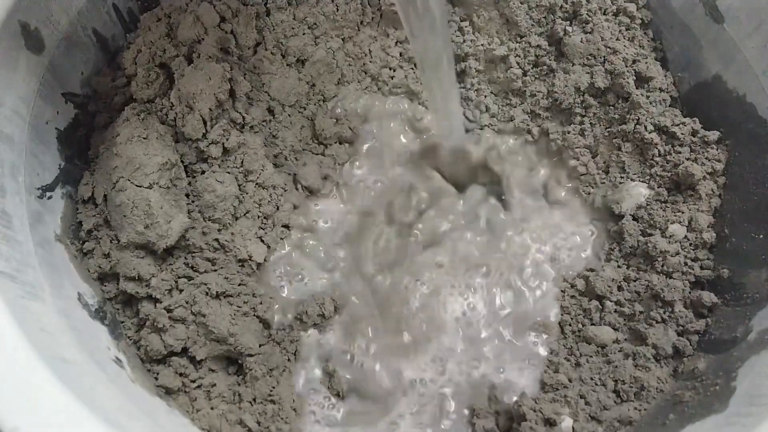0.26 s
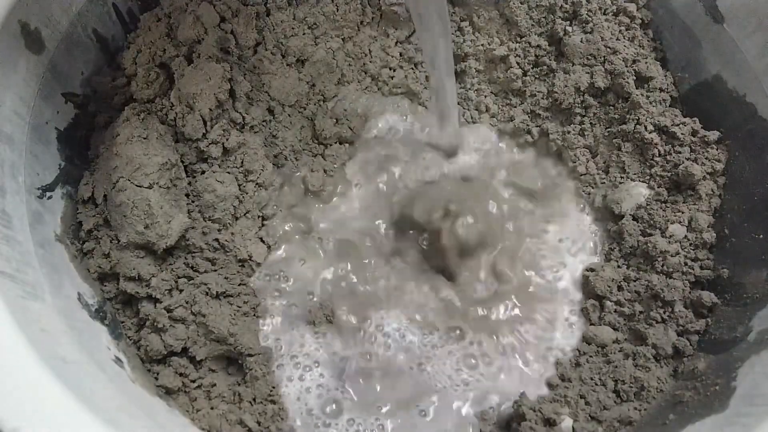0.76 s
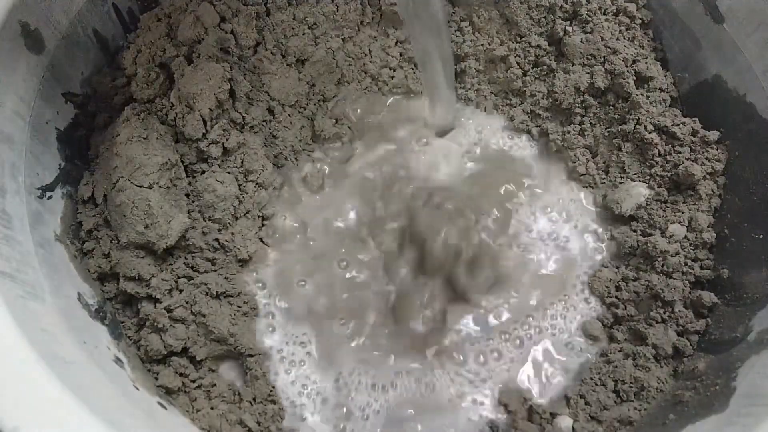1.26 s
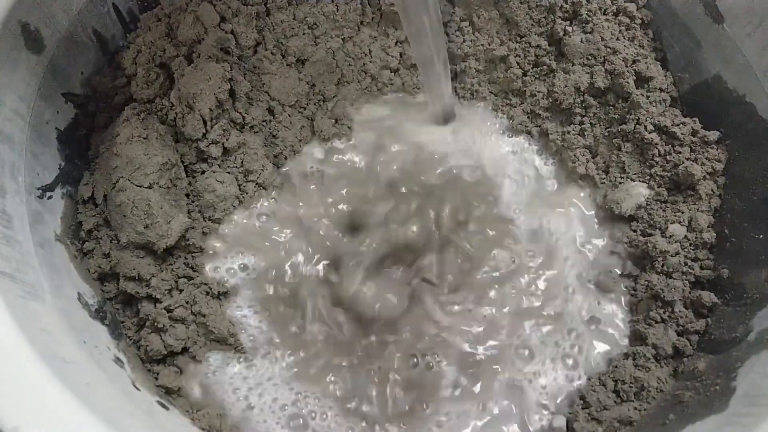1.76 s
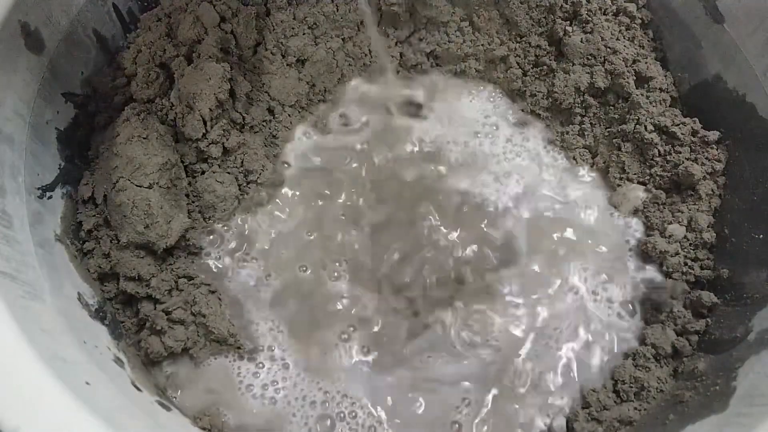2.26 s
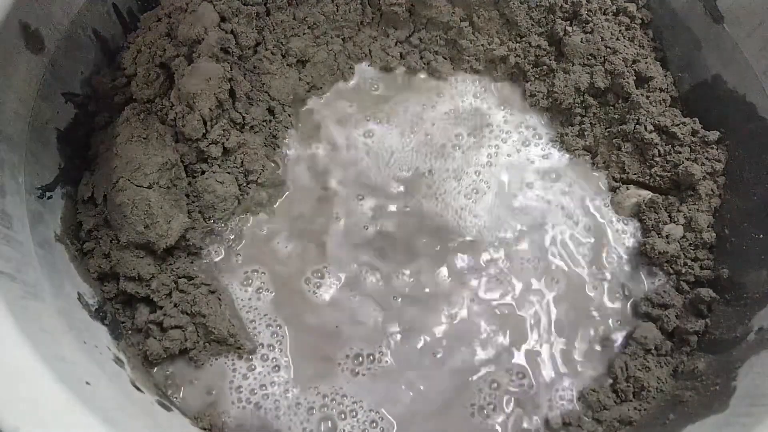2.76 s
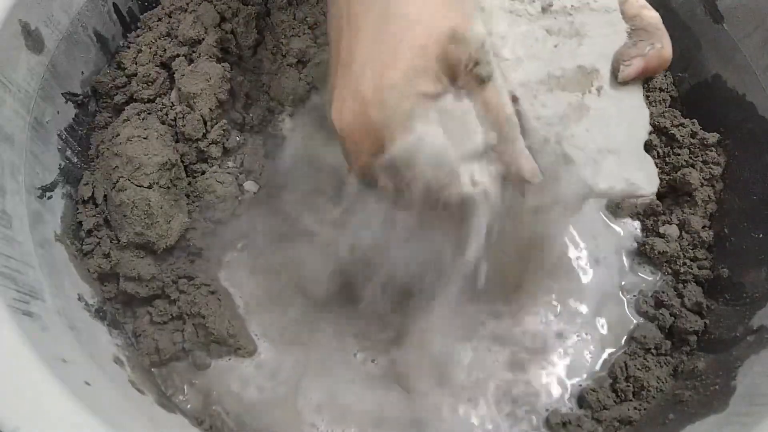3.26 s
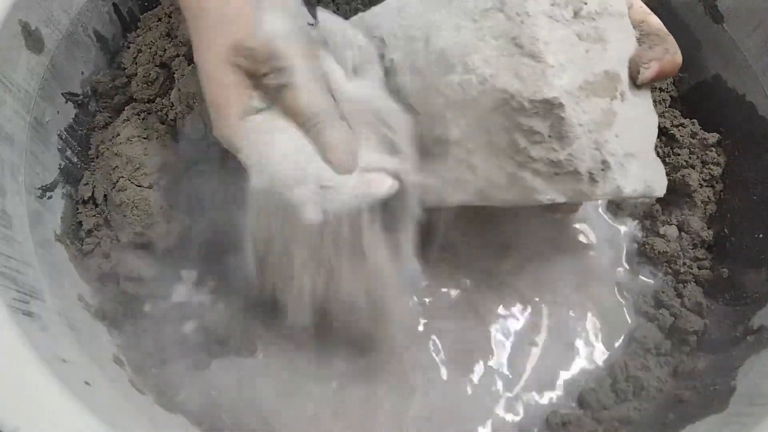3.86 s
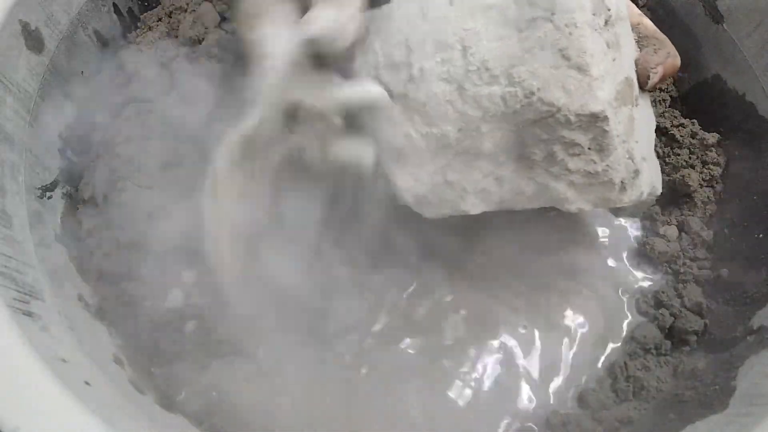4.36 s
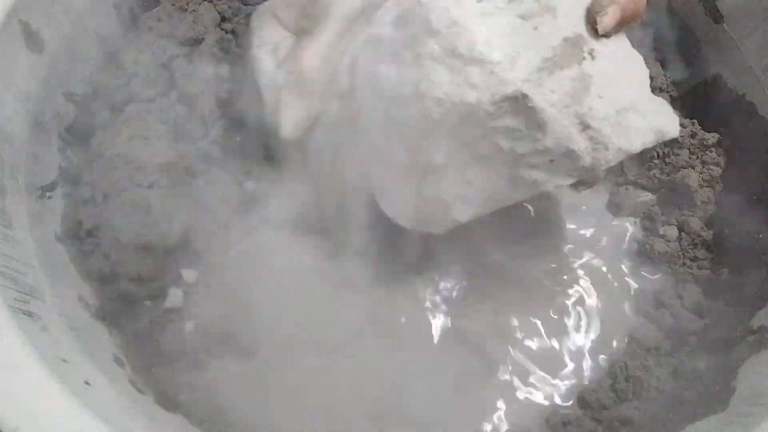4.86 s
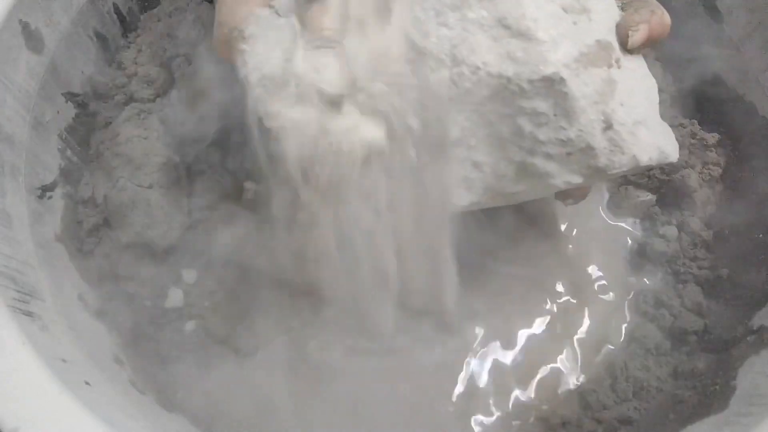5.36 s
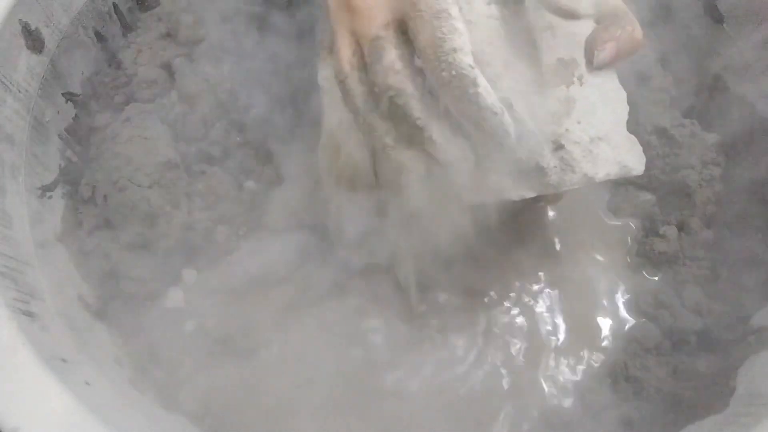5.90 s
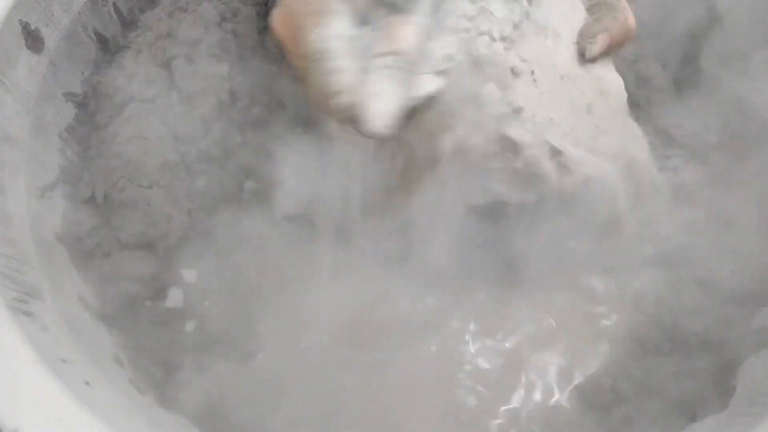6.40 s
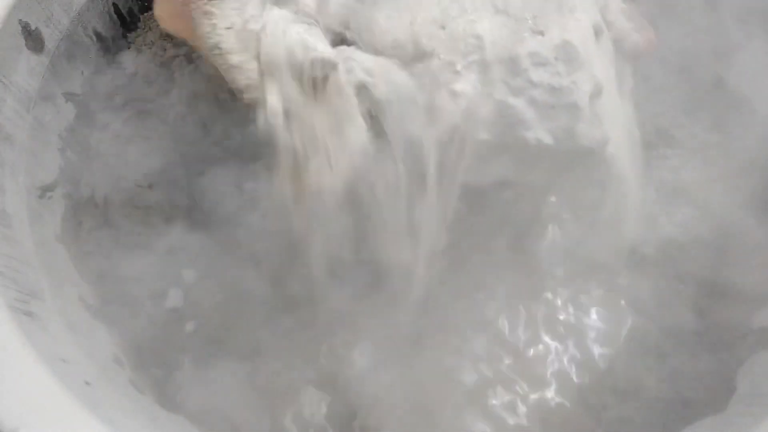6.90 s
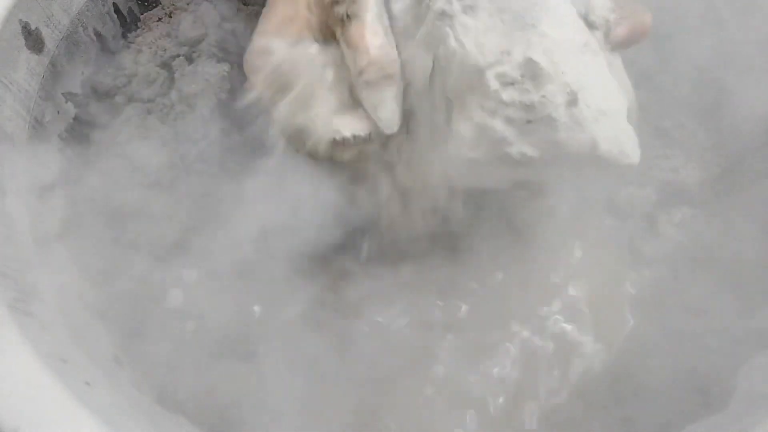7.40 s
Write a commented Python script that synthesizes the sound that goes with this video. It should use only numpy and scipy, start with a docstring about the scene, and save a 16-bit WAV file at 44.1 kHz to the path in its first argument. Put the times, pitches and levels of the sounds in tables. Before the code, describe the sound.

A short pour gurgles and thins out, then gritty sand showers hiss into the puddle with crunching lumps, soft bubbling and small plips.

```python
"""In a quiet room, a stream of water is poured onto sand in a plastic basin: it splatters, gulps and stops.
Its foam fizzes on, then a hand crumbles a dry sand-cement block over the puddle: lumps crunch, grit hisses down,
drags clouds of small bubbles under, and crumbs plip into the water.
Water is built from ringing bubbles, sand from dense random impacts shaped by spectra, over a low room rumble."""
import sys
import numpy as np
from scipy import signal
from scipy.fft import rfft, irfft, next_fast_len
from scipy.io import wavfile
from scipy.ndimage import uniform_filter1d

SR = 44100
rng = np.random.default_rng(int(sys.argv[2]) if len(sys.argv) > 2 else 0)


def inscribe(sig):
    """Save sig as 16-bit PCM at rate SR to the path in sys.argv[1].

    A 1-D sig is mono; a 2-D sig holds one channel per row.
    Samples are clipped to [-1, 1] before scaling.
    """
    pcm = np.round(np.clip(np.atleast_2d(sig).T, -1, 1) * 32767)
    wavfile.write(sys.argv[1], SR, pcm.astype(np.int16))


N = 336924
TIME = np.arange(N) / SR
CUTOFF_HZ = 16000
# edge of the steady layers, and how gently falling sand and the stream's beads die away
BED_EDGE_S, FALL_RELEASE_S = 0.0076, 0.039


def from_db(db):
    """Decibels to gain."""
    return 10 ** (np.asarray(db) / 20)


def rms_one(x):
    """Scale to unit power."""
    return x / np.sqrt(np.mean(x ** 2) + 1e-20)


def gains(rows):
    """Turn a (time, level) table into a gain per sample, dying away quickly outside its span."""
    s, db = np.transpose(rows)
    outside = np.maximum(s[0] - TIME, 0) + np.maximum(TIME - s[-1], 0)
    fade = np.exp(-np.minimum(outside / 0.11, 20))
    return from_db(np.interp(TIME, s, db)) * fade


def held(s, length, attack, release):
    """An envelope that rises, holds and dies away."""
    rise = np.clip((TIME - s) / attack, 0, 1)
    return rise * np.exp(-np.clip((TIME - s - length) / release, 0, 30))


def add(out, s, sound):
    """Mix a short sound in at a time."""
    i = min(max(int(s * SR), 0), len(out))
    out[i:i + len(sound)] += sound[:len(out) - i]


def coloured(x, spectrum):
    """Filter a signal through a (frequency, gain) table; rms 1."""
    hz, db = np.transpose(spectrum)
    size = next_fast_len(N)
    bins = np.maximum(np.arange(size // 2 + 1) * SR / size, 1)
    shape = from_db(np.interp(np.log(bins), np.log(hz), db, left=-90, right=-90))
    return rms_one(irfft(rfft(x, size) * shape, size)[:N])


def highpass(x, hz):
    """Remove what lies below a frequency."""
    return signal.sosfilt(signal.butter(4, hz, "high", fs=SR, output="sos"), x)


def drift(rate):
    """Smooth random wander, with `rate` turning points per second at most; rms 1."""
    knots = rng.standard_normal(4096)
    return rms_one(np.interp(TIME * rate, np.arange(len(knots)), knots))


def grains(per_s, spread_db):
    """Random tiny impacts, mostly small and a few large; rms 1."""
    sizes = from_db(spread_db * np.minimum(rng.exponential(1, N), 5))
    sizes = sizes * np.sign(rng.standard_normal(N))
    return rms_one(sizes * (rng.random(N) < per_s / SR))


def bubble(hz, t60, swell, rise):
    """A bubble swells, rings down and, where `rise` is set, climbs in pitch as it nears the surface."""
    t = np.arange(int((t60 + 2 * swell) * SR) + 2) / SR
    ring = np.sin(2 * np.pi * hz * (t + rise * t * t / (2 * t60)))
    return ring * (1 - np.exp(-t / swell)) * from_db(-60 * t / t60)


def swarm(low_hz, high_hz, cycles, spread_db, rise, count):
    """Bubbles born at random moments with random sizes, strengths and lifetimes; rms 1."""
    pitches = np.geomspace(low_hz, high_hz, 256)
    lives = rng.random(len(pitches))
    kinds = [bubble(hz, cycles * (.5 + life) / hz, .5 / hz, rise) for hz, life in zip(pitches, lives)]
    when, size, force = rng.random((count, 3)).T
    strengths = from_db(spread_db * np.minimum(-np.log(1 - force), 3.5))
    picks = (size * len(kinds)).astype(int)
    out = np.zeros(N)
    for s, kind, strength in zip((when * N / SR).tolist(), picks, strengths):
        add(out, s, strength * kinds[kind])
    return rms_one(out)


# the crater under the jet: first pitch, climb and top; sharpness, starting level, fade time
CRATER_HZ, CRATER_OCTAVES_PER_S, CRATER_TOP_HZ = 1510, 3.9, 5400
CRATER_Q, CRATER_DB, CRATER_FLOOD_S = 10, 1.5, 1


def crater(x):
    """The jet digs a narrow crater in the sand, whose ring climbs and fades as it floods."""
    out, state, size = np.zeros(N), np.zeros(2), 128
    for i in range(0, SR, size):  # the first second only
        hz = min(CRATER_HZ * 2 ** (CRATER_OCTAVES_PER_S * i / SR), CRATER_TOP_HZ)
        peak = signal.iirpeak(hz, CRATER_Q, fs=SR)
        out[i:i + size], state = signal.lfilter(*peak, x[i:i + size], zi=state)
    return from_db(CRATER_DB) * np.exp(-(TIME / CRATER_FLOOD_S) ** 2) * out


# force of the jet on the puddle, heard as splatter, before a small trim: (time [s], level [dB])
JET_FORCE = [(0.0, -39), (0.22, -37.5), (0.36, -41.5), (0.48, -45), (0.7, -44.5), (0.8, -49), (0.92, -47.5),
             (1.08, -46), (1.22, -54.5), (1.4, -53), (1.659, -44.5), (1.8, -46.5), (2.099, -48.5),
             (2.24, -49.5), (2.4, -55.5), (2.5, -72.5)]
# air that the jet drags under, heard as gurgle: (time [s], level [dB])
DRAGGED_AIR = [(0.0, -58), (0.17, -58), (0.23, -47.5), (0.29, -48.5), (0.35, -42), (0.43, -54.5),
               (0.64, -53.5), (0.8, -57), (0.9, -62.5), (1.07, -48.5), (1.24, -68.5), (1.43, -67.5),
               (1.55, -44.5), (1.65, -44.5), (1.73, -55), (1.95, -51), (2.26, -62), (2.41, -61), (2.5, -82)]
# colour of the large bubbles: (frequency [Hz], gain [dB])
GURGLE_COLOUR = [(120, -15), (280, -11.5), (400, -9.5), (500, -2), (620, -9.5), (780, -2), (1000, -4.5),
                 (1300, 0), (2500, -40)]
# colour of the small bubbles: (frequency [Hz], gain [dB])
SPLATTER_COLOUR = [(600, -2), (1100, -6.5), (1700, -1.5), (2050, -0.5), (2500, 2.5), (4100, 4.5),
                   (5200, -1), (6400, -17.5), (9000, -49.5)]
# colour of the stream's mist, and of foam and fine sand in the grit: (frequency [Hz], gain [dB])
HISS_COLOUR = [(1500, -41), (3000, -14.5), (4800, -10.5), (6500, -11), (8000, -5.5), (9300, -2.5),
               (10700, -3), (12000, -6.5), (13200, -13.5), (14500, -18.5), (15600, -42)]
# spray level at the jet's usual force, and its share of the jet's swing in dB
SPRAY_DB, SPRAY_FOLLOWS, USUAL_JET_DB = -49, 0.69, -44.5
# the thinning stream breaks into beads that ring high
BEADS_START_S, BEADS_LENGTH_S, BEADS_DB = 2.07, 0.24, -51


def stream():
    """The jet beats air into the puddle: large bubbles gurgle, small ones splatter, the tiniest fizz on top."""
    gurgle, splatter = gains(DRAGGED_AIR), gains(JET_FORCE)
    spray = from_db(SPRAY_DB) * (splatter / from_db(USUAL_JET_DB)) ** SPRAY_FOLLOWS
    # the jet breaks into slugs that land one after another
    surge = from_db(2.1 * drift(140))
    wash = grains(9000, spread_db=2)
    large = swarm(338, 1148, cycles=31, spread_db=-2.0, rise=0.15, count=2000)
    large = coloured(large + from_db(-3) * wash, GURGLE_COLOUR)
    small = swarm(964, 6050, cycles=29, spread_db=2.0, rise=0.22, count=7500)
    small = coloured(small + from_db(-4) * wash, SPLATTER_COLOUR)
    small = small + crater(small)
    mist = swarm(4470, 20000, cycles=130, spread_db=2.0, rise=0.042, count=8000)
    mist = coloured(mist + from_db(3.0) * grains(21000, spread_db=5.5), HISS_COLOUR)
    beads = swarm(2400, 6300, cycles=30, spread_db=3.0, rise=0.16, count=1100)
    beads = held(BEADS_START_S, BEADS_LENGTH_S, BED_EDGE_S, FALL_RELEASE_S) * beads
    jet = gurgle * large + from_db(-1.3) * splatter * small + spray * mist
    return surge * jet + from_db(BEADS_DB) * beads


# colour of the room's rumble: (frequency [Hz], gain [dB])
ROOM_COLOUR = [(20, -18.5), (45, -13), (70, -2.5), (100, -6.5), (140, 0.5), (200, -11.5), (300, -13.5),
               (500, -15.5), (900, -25.5), (3000, -47.5)]
ROOM_DB = -77


def room_tone():
    """The quiet room rumbles steadily: noise weighted towards the lows."""
    return from_db(ROOM_DB) * coloured(rng.standard_normal(N), ROOM_COLOUR)


def basin(x, wall_db, ring_t60):
    """A short sound rattles briefly between the basin's walls and the water."""
    t = np.arange(1536) / SR
    echoes = rng.standard_normal(len(t)) * from_db(-60 * t / ring_t60) * (t > .0003)
    direct = t == 0
    path = from_db(wall_db) * echoes / np.linalg.norm(echoes) + direct
    return signal.fftconvolve(x, path)


# the loudest drops and crumbs hitting the water, levels before trims:
# (time [s], pitch [Hz], plip level [dB], tick level [dB])
IMPACTS = [(0.002, 2290, -7, -47), (0.02, 2100, -18.5, -22), (0.068, 1440, -16, -64),
           (0.118, 2230, -13.5, -36), (0.197, 1950, -14.5, -34), (0.212, 2500, -18, -20),
           (0.215, 1540, -7, -21.5), (0.239, 900, -15.5, -38), (0.301, 1230, -15, -57),
           (0.374, 2800, -19, -23.5), (0.458, 3920, -26, -14.5), (0.532, 1960, -19.5, -38),
           (0.587, 1140, -18, -37), (0.83, 1860, -19.5, -23), (0.849, 1740, -18.5, -44),
           (0.882, 2350, -15, -43), (0.888, 2140, -29, -31), (0.9, 1100, -16.5, -25.5),
           (0.987, 5500, -20, -55), (1.0, 4250, -32, -24.5), (1.207, 1610, -55, -22),
           (1.242, 3680, -28, -42), (1.305, 1850, -17, -21), (1.414, 1070, -16, -27.5),
           (1.469, 2580, -11, -17.5), (1.532, 1120, -11.5, -19), (1.55, 1380, -7, -28),
           (1.571, 2100, -21, -16), (1.628, 2350, -15, -34), (1.636, 2320, -19, -16.5),
           (1.674, 1850, -19.5, -22), (1.686, 1900, -22, -42), (1.703, 1620, -20, -38),
           (1.776, 2740, -21.5, -20.5), (1.845, 1580, -22, -25.5), (1.89, 2710, -18, -28),
           (1.938, 5700, -33, -8.5), (1.959, 4400, -20, -31), (1.971, 3150, -22.5, -27),
           (2.081, 4720, -23, -54), (2.108, 2980, -33, -25), (2.139, 4630, -17.5, -54),
           (2.156, 4270, -46, -21), (2.18, 2440, -24, -19), (2.215, 2980, -23.5, -58),
           (2.254, 3140, -19, -25.5), (2.287, 3350, -30, -26), (2.309, 5370, -29, -23),
           (2.358, 3360, -26.5, -35), (2.364, 4150, -30, -40), (2.383, 4800, -29, -46),
           (2.433, 5450, -57, -28.5), (2.444, 3270, -46, -31), (2.648, 1200, -44, -59),
           (2.726, 4820, -20.5, -70), (3.318, 2150, -23, -24.5), (3.442, 2830, -19.5, -46),
           (3.458, 3030, -26, -52), (3.533, 3450, -28, -51), (3.57, 1180, -21.5, -32),
           (3.62, 1390, -27, -34), (3.664, 1230, -28, -46), (3.749, 970, -29.5, -50),
           (3.757, 1300, -32.5, -30), (3.784, 1370, -37.5, -28), (3.972, 2680, -28, -46),
           (4.049, 3100, -36.5, -43), (4.169, 3830, -38, -49), (4.221, 1260, -33, -47),
           (4.252, 1350, -32.5, -64), (4.588, 3400, -23.5, -79), (4.879, 5400, -29.5, -35),
           (5.545, 4270, -31, -66.5), (5.779, 2120, -40.5, -47), (6.01, 1580, -24.5, -66),
           (6.49, 3400, -33, -36), (6.739, 2940, -26.5, -39), (6.77, 5700, -34.5, -36),
           (6.901, 5640, -23.5, -36), (6.943, 2670, -32.5, -21.5), (6.955, 3620, -28, -28.5),
           (6.982, 1790, -27, -35), (7.101, 3800, -31, -62), (7.113, 2460, -19, -24.5),
           (7.118, 2510, -9, -26), (7.16, 1490, -30, -47), (7.242, 1820, -26.5, -30)]
# heavy drops of the stream slap deeper than dry crumbs
DROP_LOW_HZ, CRUMB_LOW_HZ = 366, 1100


def drops():
    """Each impact slaps the surface, ticks, and traps one short-lived bubble."""
    plips, slaps, ticks = np.zeros((3, N))
    chances = rng.standard_normal((len(IMPACTS), 2))
    for (s, hz, plip_db, tick_db), (life, tone) in zip(IMPACTS, chances):
        plip_t60 = 0.0052 * min(1, 3000 / hz) * np.exp(0.073 * life)
        plip = bubble(hz, plip_t60, swell=0.000164, rise=0.026)
        plip = highpass(basin(plip, wall_db=-2.5, ring_t60=0.015), hz=0.83 * hz)
        add(plips, s, from_db(plip_db - 2.5) * plip)

        low_hz = DROP_LOW_HZ if s < FOAM_START_S else CRUMB_LOW_HZ
        slap = bubble(3800, t60=0.0005, swell=.00003, rise=0)
        slap = highpass(basin(slap, wall_db=-15, ring_t60=0.072), hz=low_hz)
        add(slaps, s, from_db((plip_db + tick_db) / 2 + 12.0) * slap)

        tick = bubble(9300 * np.exp(0.028 * tone), t60=0.0011, swell=.00003, rise=0)
        add(ticks, s, from_db(tick_db + 5.5) * basin(tick, wall_db=-3.5, ring_t60=0.016))
    return plips + slaps + highpass(ticks, hz=2940)


# big air bubbles, level before a trim: (time [s], pitch [Hz], level [dB], ring t60 [s])
AIR_POCKETS = [(0.637, 510, -27, 0.016), (.885, 771, -33, 0.1), (1.417, 994, -26, 0.026),
               (1.487, 459, -21.5, 0.12), (1.533, 480, -16.5, 0.017), (1.566, 574, -14.5, 0.038),
               (1.578, 573, -29.5, 0.15), (1.637, 762, -22, 0.056), (1.642, 860, -17, 0.023),
               (1.672, 980, -25, 0.038), (1.683, 934, -24.5, 0.036), (1.738, 664, -23, 0.081),
               (1.822, 745, -30.5, .06), (1.856, 774, -14, 0.026), (1.884, 945, -18, 0.036),
               (1.943, 456, -35, 0.056), (2.385, 530, -42.5, 0.065), (3.074, 645, -53.5, 0.11),
               (3.635, 387, -48, 0.047), (5.677, 636, -54, 0.055), (6.325, 456, -27, 0.0076),
               (7.152, 524, -34, 0.0092)]
GULP_SWELL_SHARE, GULP_RISE = 0.052, .11   # shares of its ringing time and of its pitch


def gulps():
    """Large pockets of air pinch off under the stream and behind sinking lumps."""
    out = np.zeros(N)
    for s, hz, db, t60 in AIR_POCKETS:
        add(out, s, from_db(db - 2.5) * bubble(hz, t60, GULP_SWELL_SHARE * t60, GULP_RISE))
    return highpass(out, hz=207.5)


# the fingers rub off a pinch of sand, level before a trim: (time [s], length [s], level [dB])
PINCHES = [(2.869, 0.11, -54), (3.07, 0.031, -50.5), (3.159, 0.019, -40), (4.374, 0.027, -60.5),
           (4.443, 0.022, -61), (4.586, 0.17, -59), (5.68, 0.049, -60), (5.864, 0.024, -67),
           (5.956, 0.1, -61.5), (6.06, 0.075, -61), (6.85, 0.096, -54.5)]
# a handful slides into the water and drags air under, levels before trims:
# (time [s], swell [s], length [s], patter level [dB],
#  bubble cloud pitch [Hz], its spread [log pitch], cloud level [dB]); the cloud plays in plunges()
HANDFULS = [(3.28, 0.059, 0.26, -51, 538, 0.233, -52.5), (3.582, 0.02, 0.15, -60, 743, 0.21, -62),
            (3.925, 0.066, 0.13, -57.5, 900, 0.1, -58.5), (4.189, 0.073, 0.12, -60, 1010, 0.078, -64.5),
            (4.793, 0.15, 0.23, -54.5, 653, 0.059, -60), (5.365, 0.036, 0.11, -60, 566, 0.12, -62.5),
            (6.139, 0.0092, 0.069, -76, 225, 0.32, -54.5), (6.218, 0.016, 0.3, -51, 472, 0.11, -55),
            (7.118, 0.02, 0.049, -58.5, 486, 0.32, -53), (7.558, 0.039, 0.16, -53, 584, 0.28, -59)]
FALL_ATTACK_S = 0.043   # of a pinch


def sandfall():
    """How much sand is landing, as a gain: pinches and handfuls swell, hold and thin out."""
    out = np.zeros(N)
    for s, length, db in PINCHES:
        out += from_db(db) * held(s, length, FALL_ATTACK_S, FALL_RELEASE_S)
    for s, swell, length, db, *_ in HANDFULS:
        out += from_db(db) * held(s, length, swell, FALL_RELEASE_S)
    return uniform_filter1d(out, size=1024)


# drifting comb colour of the sand: delay, strength, wander (in log delay) and how often it turns
COMB_S, COMB_DB, COMB_WANDER, COMB_MOVES_PER_S = 0.000937, -10, 0.058, 4


def shifting(x):
    """Mix in a faint inverted copy at a slowly wandering delay, so the sand's colour drifts."""
    lag = COMB_S * np.exp(COMB_WANDER * drift(COMB_MOVES_PER_S))
    delayed = np.interp(TIME - lag, TIME, x)
    return rms_one(x - from_db(COMB_DB) * delayed)


# patter of the sifting dust, which now and then nearly stops, before a trim: (time [s], level [dB])
SIFTING = [(2.87, -67.5), (3.55, -60), (3.75, -60.5), (4.15, -62.5), (4.55, -81), (5.1, -59.5), (5.27, -81),
           (5.34, -61.5), (5.78, -80), (5.86, -88), (5.9, -69.5), (6.7, -67), (7.05, -62), (7.64, -66.5)]
# colour of the coarse sand: (frequency [Hz], gain [dB])
PATTER_COLOUR = [(720, -26), (980, -8), (1130, 2), (1280, 9.5), (1500, 3), (1720, 5), (2080, -6), (2550, 5),
                 (3200, 0.5), (4600, -4), (6000, -7), (9000, -16)]
# once the stream stops the foam fizzes on; patter level before a trim
FOAM_START_S, FOAM_HISS_DB, FOAM_PATTER_DB = 2.4, -59, -81.5
# then dust sifts from the block, its hiss without a break
SIFT_START_S, SIFT_HISS_DB, SIFT_WAVER_DB, SIFT_WAVERS_PER_S = 3.2, -59.5, 1, 12
HISS_OVER_PATTER_DB = 4   # the hiss of a fall keeps step with its patter, before the patter's trim


def grit():
    """Sand showers on the water in uneven trickles; the finest grains and the foam hiss."""
    foam = held(FOAM_START_S, SIFT_START_S - FOAM_START_S - BED_EDGE_S, BED_EDGE_S, BED_EDGE_S)
    waver = from_db(SIFT_WAVER_DB * drift(SIFT_WAVERS_PER_S))
    sift = held(SIFT_START_S, N / SR, BED_EDGE_S, BED_EDGE_S) * waver
    falling = sandfall()
    steady_patter = from_db(FOAM_PATTER_DB) * foam + gains(SIFTING) * sift
    steady_hiss = from_db(FOAM_HISS_DB) * foam + from_db(SIFT_HISS_DB) * sift
    # falls and steady layers add in power
    patter = np.hypot(falling, steady_patter)
    hiss = np.hypot(from_db(HISS_OVER_PATTER_DB) * falling, steady_hiss)
    trickle = from_db(1.9 * drift(55))
    # coarser crumbs plip singly
    crumbs = swarm(1700, 6650, cycles=11.5, spread_db=0.5, rise=0.076, count=600)
    coarse = coloured(grains(10000, spread_db=2.5), PATTER_COLOUR) + from_db(-8) * crumbs
    # lone foam bubbles bursting
    pops = swarm(3600, 16400, cycles=15, spread_db=-4.5, rise=0.077, count=900)
    fine = coloured(grains(20000, spread_db=4.0) + from_db(-10.5) * foam * pops, HISS_COLOUR)
    return trickle * (from_db(-0.95) * patter * shifting(coarse) + hiss * shifting(fine))


# dull bumps of the basin: (time [s], pitch [Hz], level [dB], ring t60 [s])
THUDS = [(3.012, 130, -41.5, 0.12), (3.85, 100, -44, 0.059), (6.13, 219, -16, 0.016),
         (7.383, 262, -33, 0.059)]


def bumps():
    """The loaded basin answers a nudge with a soft low thud."""
    out = np.zeros(N)
    for s, hz, db, t60 in THUDS:
        add(out, s, from_db(db) * bubble(hz, t60, swell=0.015, rise=0))
    return out


# lumps giving way in the fist: (time of the height [s], fall [s], crackle level [dB], body level [dB])
COLLAPSES = [(3.195, 0.03, -34.5, -39), (4.708, 0.026, -36, -51.5), (4.735, 0.022, -45.5, -55.5),
             (6.105, 0.016, -39.5, -56), (6.141, 0.029, -35, -46), (7.396, 0.027, -33, -43.5)]
# colour of the breaking grains: (frequency [Hz], gain [dB])
CRACKLE_COLOUR = [(700, -79), (1200, 9), (1700, 4), (2080, -2), (2550, 8.5), (3500, 2.5), (6000, 0),
                  (8000, 8.5), (9200, 14), (11000, 8.5), (13000, -1), (15500, -7)]
# colour of the lump's weight: (frequency [Hz], gain [dB])
BODY_COLOUR = [(90, -22), (160, -21.5), (230, -2.5), (420, 7), (750, 4), (1000, 0.5), (1600, -4)]
CRUNCH_BUILD_SHARE = 0.32   # of its fall time


def crunches():
    """A lump collapses in a short avalanche of breaking grain bonds, and its rubble settles."""
    crackle, body = np.zeros(N), np.zeros(N)
    t = np.arange(-SR // 8, SR // 2) / SR
    for s, fall, crackle_db, body_db in COLLAPSES:
        width = np.where(t < 0, CRUNCH_BUILD_SHARE * fall, fall)
        avalanche = np.exp(-np.minimum((t / width) ** 2, 20))
        settling = from_db(-13.0) * (t > 0) * np.exp(-np.abs(t) / 0.12)
        add(crackle, s + t[0], from_db(crackle_db) * avalanche)
        add(body, s + t[0], from_db(body_db) * np.maximum(avalanche, settling))
    crackle = crackle * coloured(grains(15000, spread_db=3.5), CRACKLE_COLOUR)
    return crackle + body * coloured(grains(2500, spread_db=1.5), BODY_COLOUR)


# the rubble of every crunch lands just after it with its own bubble cloud
# (spread in log pitch; level against the crunch's body, before trims)
RUBBLE_DELAY_S, RUBBLE_LENGTH_S, RUBBLE_HZ, RUBBLE_SPREAD, RUBBLE_DB = 0.022, 0.1, 578, 0.334, -17.5
CLOUD_BUBBLES_PER_S = 550
CLOUD_SHARE = 1.2   # bubbles come once a handful is at its height, for this share of the time left


def plunges():
    """Sinking sand sheds a dense cloud of like-sized bubbles, weaker and smaller as it thins out."""
    out = np.zeros(N)
    sinking = []
    for s, swell, length, _, hz, spread, db in HANDFULS:
        sinking.append((s + swell, CLOUD_SHARE * max(length - swell, .01), hz, spread, db))
    for s, _, _, body_db in COLLAPSES:
        rubble_db = body_db + RUBBLE_DB
        sinking.append((s + RUBBLE_DELAY_S, RUBBLE_LENGTH_S, RUBBLE_HZ, RUBBLE_SPREAD, rubble_db))
    chances = rng.random((len(sinking), 300, 3))
    for (s, length, hz, spread, db), chance in zip(sinking, chances):
        cloud = np.zeros(SR)
        for age, size, strength in chance[:int(CLOUD_BUBBLES_PER_S * length)]:
            pitch = hz * np.exp(1.64 * spread * (2 * size - 1) + 0.12 * age)
            ring = bubble(pitch, 26 / pitch, 1.6 / pitch, rise=0.094)
            add(cloud, age * length, np.sign(strength - .5) * np.sqrt(1 - age) * ring)
        # longer clouds carry more energy
        add(out, s, from_db(db - 4.5) * rms_one(cloud) * np.sqrt(length))
    return out


def scene():
    """Water and sand in the basin, over the rumble of the room."""
    water = stream() + gulps() + drops()
    sand = grit() + crunches() + plunges() + bumps()
    return (water + sand + room_tone())[None]


def record(dry):
    """The top octave ends steeply."""
    return signal.sosfilt(signal.ellip(10, .2, 80, CUTOFF_HZ, fs=SR, output="sos"), dry)


dry = scene()
out = record(dry)
inscribe(out)
```